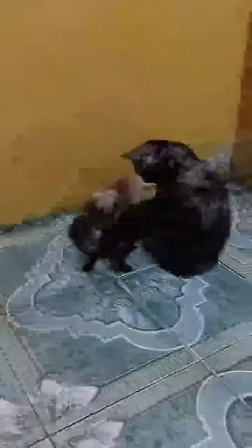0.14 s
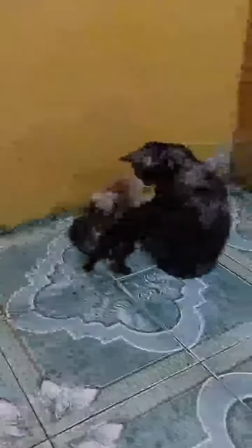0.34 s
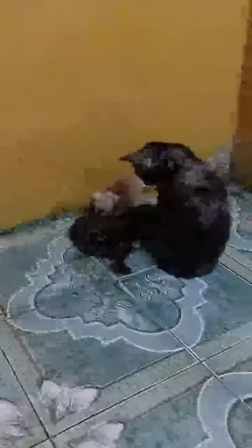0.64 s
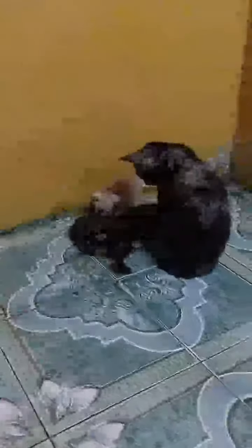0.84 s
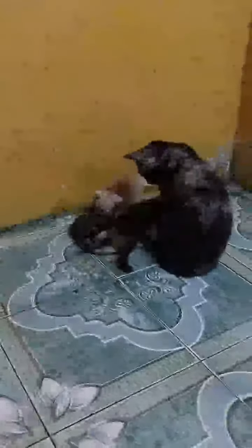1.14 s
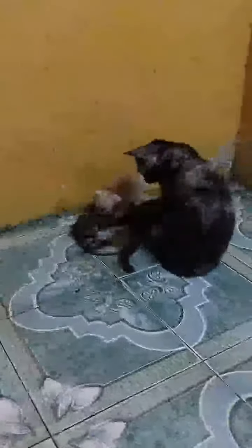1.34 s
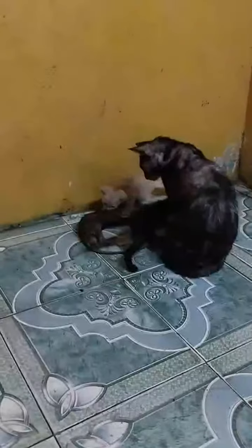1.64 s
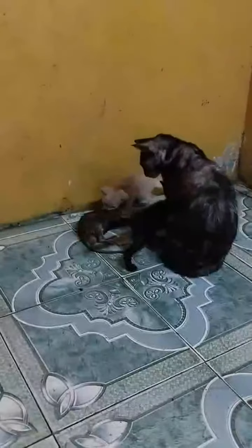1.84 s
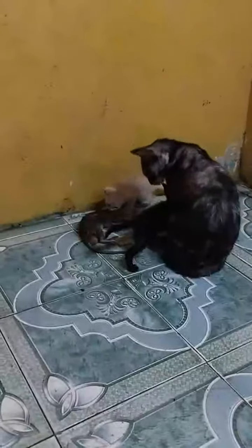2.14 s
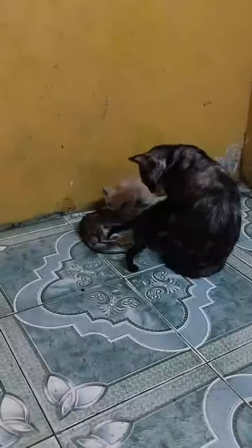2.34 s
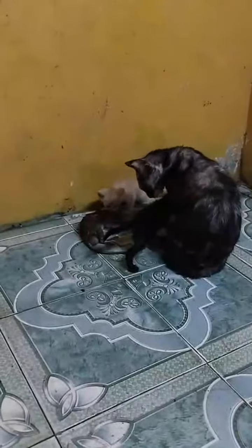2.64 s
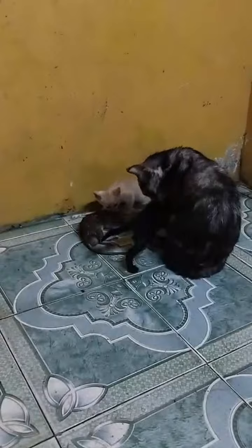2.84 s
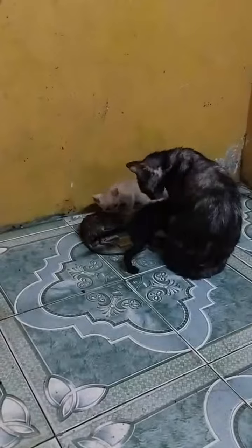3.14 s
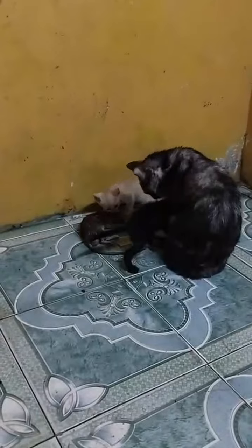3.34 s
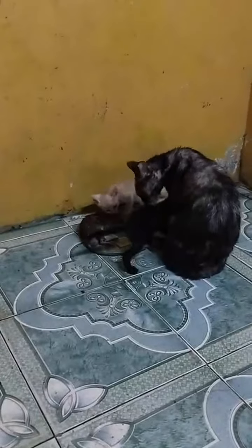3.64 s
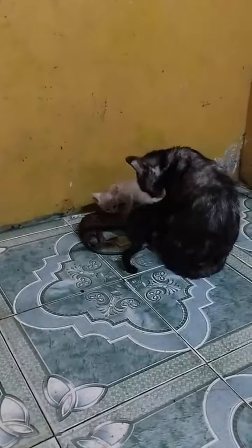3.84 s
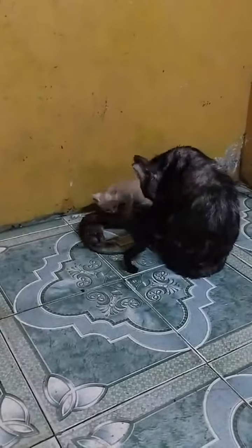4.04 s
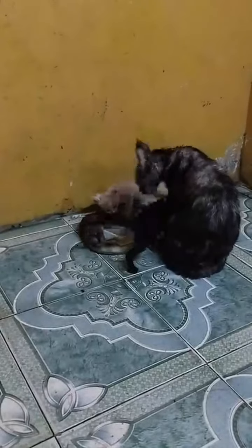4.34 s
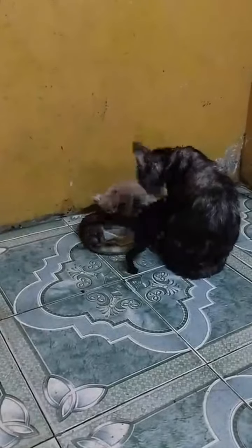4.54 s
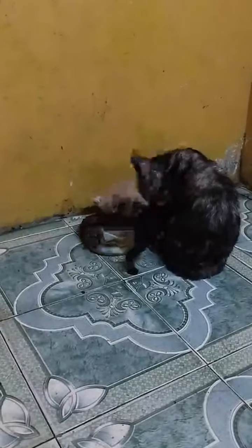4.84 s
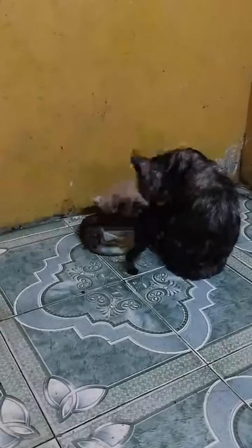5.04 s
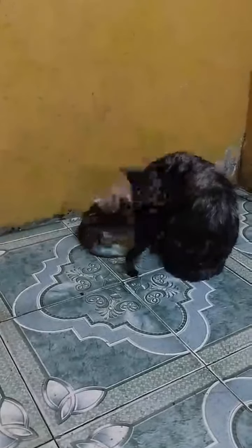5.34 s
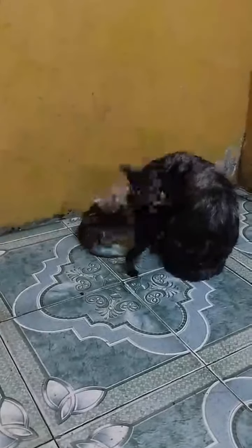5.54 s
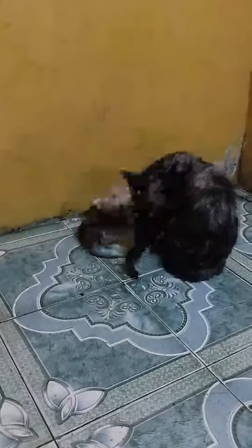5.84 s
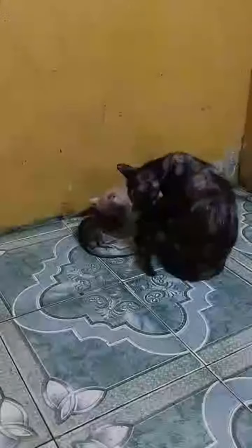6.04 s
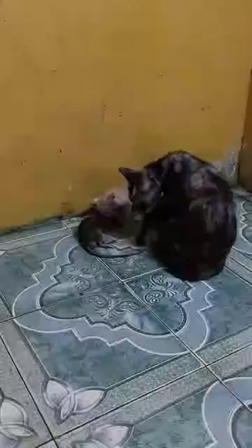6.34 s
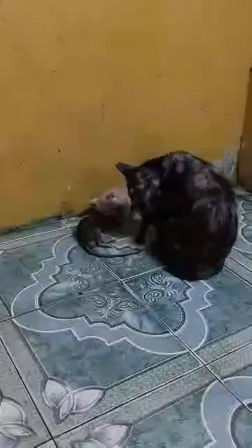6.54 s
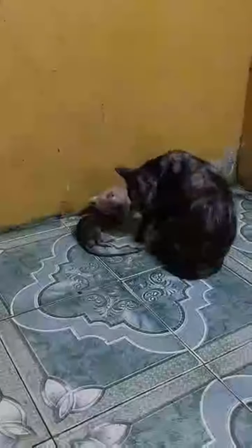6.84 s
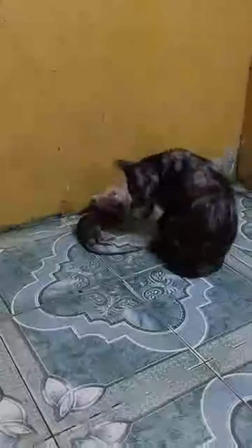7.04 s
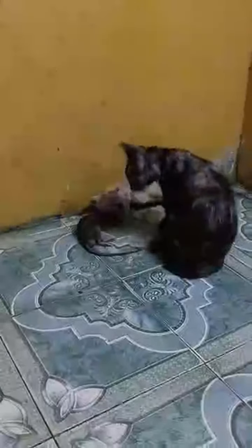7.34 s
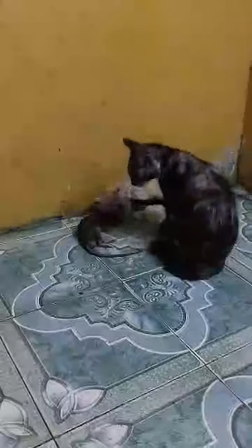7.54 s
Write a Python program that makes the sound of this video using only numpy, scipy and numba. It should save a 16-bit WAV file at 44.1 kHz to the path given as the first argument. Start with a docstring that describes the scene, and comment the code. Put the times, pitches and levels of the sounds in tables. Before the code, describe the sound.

Indoors, a steady low fan hum with a light rush of air runs throughout, and the microphone is nudged softly now and then. A mouse suddenly gives a loud, very short chirp, then two sharp high squeaks and a run of five quieter raspy squeals, each with a short echo off hard walls. It ends with one faint, thin whine, leaving only the hum.

```python
"""First a fan hums and swishes in a tiled room, and a hand-held phone thumps now and then.
Then a mouse, cornered by a pawing cat, gives one chip, two sharp squeaks that crack upward, five
hoarse squeals and a last thin whine. Its tiny vocal folds buzz, its throat and mouth shape the
buzz, and forced air adds hiss and rasp. The bare walls ring after each cry."""
import sys
import numpy as np
from scipy import signal
from scipy.fft import rfft, irfft, next_fast_len
from scipy.io import wavfile
from scipy.ndimage import uniform_filter1d
from numba import njit

SR = 44100
rng = np.random.default_rng(int(sys.argv[2]) if len(sys.argv) > 2 else 0)


def master_out(mix):
    """Clip the mix to full scale and print it as 16-bit PCM to the path in sys.argv[1]."""
    frames = np.transpose(np.atleast_2d(mix))
    ceiling = np.clip(frames, -1, 1)
    pcm = np.round(ceiling * 32767).astype(np.int16)
    wavfile.write(sys.argv[1], SR, pcm)


N = 338688
T = np.arange(N) / SR
TOP_HZ = 15750

# Levels are set before mixing. A share runs from 0 to 1; peak_share is how far in a cry is loudest.
# sharp squeaks: start_s, length_s, pitch_hz, climb_hz_per_s, level_db, peak_share, lead_in_db
SQUEAK_CRIES = [(3.697, .082, 1069, 682, -15.5, 0.93, -34), (3.96, .098, 1093, 400, -11.5, 0.55, -24)]
# voice cracks: start_s, length_s, pitch_hz, glide_octaves, dip_octaves, level_db, rough_share
VOICE_CRACKS = [(3.778, 0.0089, 2440, 0.02, 0, -24, .35), (3.7888, 0.022, 2425, 0.15, .07, -15, .15),
                (3.817, 0.008, 2240, -0.28, 0, -21.5, 0.4), (3.824, .058, 2370, -.06, 0.0096, -35.5, 0.54),
                (4.058, 0.011, 2550, 0.073, 0.053, -23, 0.48),
                (4.067, 0.0237, 2405, 0.078, 0.213, -13.5, 0.1), (4.097, .065, 2385, -.1, 0, -39, 0.38)]
# hoarse squeals: start_s, length_s, pitch_hz, glide_hz_per_s, overshoot_hz, tone_db, peak_share, jet_db
SQUEAL_CRIES = [(3.982, .225, 2358, 1201, -1.5, -34, .55, -46),
                (4.361, 0.19, 2194, 5800, -2, -42.5, 0.86, -49.5),
                (4.763, 0.109, 2260, -300, 463, -32, 0.71, -45),
                (5.165, 0.11, 2260, -500, 459, -32.5, 0.53, -40.5),
                (5.545, 0.15, 2270, -100, 482, -31, 0.49, -43.5)]
# the rasp that ends each squeal: start_s, length_s, level_db, peak_share, mouth_from_hz, mouth_to_hz
SQUEAL_ENDINGS = [(4.091, .14, -39.5, 0.73, 4850, 5350), (4.47, .16, -36, 0.91, 4740, 5690),
                  (4.851, .145, -34, 0.85, 3200, 5030), (5.242, 0.15, -36.5, .55, 3400, 4950),
                  (5.639, 0.15, -35, 0.64, 2920, 5140)]
# the course of the last whine: time_s, level_db, mouth_hz
WHINE_PATH = [(6.28, -69, 6300), (6.33, -47.5, 6450), (6.37, -54, 6400), (6.40, -44, 4700),
              (6.465, -56, 4660), (6.55, -53.5, 5130), (6.64, -73, 5300), (6.68, -48, 1050),
              (6.75, -63, 1000)]
# a sharp chip, scuffs and low pops: start_s, pitch_hz, level_db, rise_s, decay_s, noise_share
SHORT_RINGS = [(3.546, 2224, -3.5, 0.0035, .0017, .09), (3.637, 2170, -29, 0.0032, .009, .55),
               (3.656, 2380, -34.5, .002, 0.065, .6), (3.694, 755, -23.5, .0012, 0.01, .11),
               (3.7003, 615, -12.5, 0.0082, 0.0058, .01), (5.961, 680, -33, 0.0043, 0.01, .51)]
# nudges of the phone: start_s, level_db
PHONE_NUDGES = [(0.452, -44), (1.66, -41), (1.724, -33.5), (1.769, -39), (1.827, -36), (2.158, -40),
                (2.358, -34.5), (3.373, -42), (6.082, -43)]
# echoes from near walls: delay_s, level_db
WALL_ECHOES = [(0.0229, -26), (0.032, -16), (.043, -13.5), (0.067, -11.5)]
# how fast the fan spins: time_s, turns_per_s
FAN_SPIN = [(0, 5), (.4, 4.85), (.8, 4.3), (1.7, 4.55), (2.2, 5), (3.4, 4.95), (3.9, 4.55), (5.2, 4.6),
            (5.7, 5), (7.68, 5.15)]
# how the fan's draught swells and eases: time_s, change_db
FAN_DRAUGHT = [(0, 1), (1.9, -0.8), (3.4, 1.1), (5.3, 1.4), (6.6, 0.7), (7.68, -2.7)]

# A colour says how strong a sound is from low to high.
# throat colours for each kind of cry: frequency_hz, level_db
SQUEAK_COLOUR = [(600, -16.5), (1100, -10.5), (1700, -5), (2200, 4.5), (2650, -5.5), (3300, -52.5),
                 (4400, -14.5), (5000, -23), (5600, -37), (6700, -37), (8000, -61), (15000, -62)]
SQUEAL_COLOUR = [(1200, -50), (2280, -3), (2750, -10), (3300, -19), (4600, 5), (5400, -10.5), (6800, -8.5),
                 (8300, -40), (9100, -18.5), (10300, -26), (11300, -15.5), (12400, -31), (15500, -40)]
WHINE_COLOUR = [(1070, 0.5), (2100, 4), (3200, -7.5), (4280, 1), (5350, -5), (6450, -6.5), (7500, -18),
                (8600, -18.5), (9700, -14), (10700, -16), (11900, -10), (13000, -34)]
# colours of the mouse's breath: frequency_hz, level_db
JET_AIR = [(2000, -28), (3200, -16), (5300, 7), (6300, 2), (8000, -4), (8600, -2), (9200, -12),
           (10300, -3.5), (11400, -5), (12300, -2), (15500, -5)]
RASP_AIR = [(700, -34.5), (1700, -9), (2400, 4.5), (3300, -3), (4600, -0.5), (5900, -7.5), (6900, -3),
            (8200, -11), (8900, -15.5), (11300, -14), (13000, -12), (15500, -14.5)]
SQUEAK_AIR = [(700, -15.5), (2400, 5.5), (3500, -14), (5000, -5), (7000, -15), (10000, -37)]
# colours of the room's ring: frequency_hz, level_db
LONG_TAIL = [(300, -10.5), (1100, -9.5), (2300, -2.5), (6000, 2.5), (9000, -2)]
BRIGHT_TAIL = [(5000, -6), (9000, .5), (16000, -9)]
# colours of the air the fan moves: frequency_hz, level_db
FAN_RUMBLE = [(25, -32), (45, -6.5), (65, -1), (100, -2.5), (170, -1.5), (350, -7), (600, -10),
              (1000, -12.5), (1800, -12.5), (2600, -18.5), (5000, -53)]
FAN_HISS = [(1500, -51), (1850, -10), (2100, 0.5), (2450, -3), (2900, -9), (3500, -10.5), (4500, -8.5),
            (5600, -14.5), (6800, -13.5), (8200, -19.5), (9000, -25.5), (11700, -31.5), (12200, -21.5),
            (15500, -23)]
FAN_SWIRLS = [(150, -26.5), (330, 6), (450, -.5), (900, -25)]
FAN_SWISH = [(1700, -28), (2100, -1), (2400, -.5), (2900, -14.5), (3700, -28), (4450, -12.5),
             (5200, -44), (8000, -44.5)]


def squeaks():
    """Each squeak slides down into its note, climbs steadily, then turns rough and flips upward."""
    out = np.zeros(N)
    lead_s, attack_s, break_s, flip_s = .013, .0017, .005, .0013
    catch_s, catch_width_s = 4.041, .0086  # the voice catches once in the louder squeak
    for start, length, pitch, climb, db, peak, lead_db in SQUEAK_CRIES:
        t = span(lead_s + length)[0] - lead_s
        lead = np.maximum(-t / lead_s, 0)
        voiced = np.clip(t / attack_s, 0, 1)
        breaking = np.exp((t - length) / break_s)
        bend_octaves = .9 * lead + .51 * np.exp((t - length) / flip_s)
        hz = (pitch + climb * t) * 2 ** bend_octaves
        rise, fall = arch(t / length, peak)
        catch_db = -6 * np.exp(-((start + t - catch_s) / catch_width_s) ** 2)
        note_db = db - 5 * np.sqrt(rise) - 5.5 * fall * breaking + catch_db
        gain = voiced * undb(note_db) + (1 - voiced) * (1 - lead) * undb(lead_db)
        rough = .048 + .53 * (1 - voiced) + .55 * breaking
        add(out, start - lead_s, fade(t + lead_s) * gain * sharp_voice(hz, rough))
    return out


def cracks():
    """After each squeak the voice cracks into broken yelps about an octave higher."""
    out, edge_s = np.zeros(N), .0029
    for start, length, pitch, glide, dip, db, rough in VOICE_CRACKS:
        t, progress = span(length)
        hz = pitch * 2 ** (glide * (progress - .5) + dip * (2 * progress - 1) ** 2)
        add(out, start, fade(t, edge_s, edge_s) * undb(db) * sharp_voice(hz, rough))
    return out


def squeals():
    """Strained cries: a shaky tone swells over a jet of air and is cleanest at its loudest."""
    out = np.zeros(N)
    settle_s, peak_rough, edge_rough = .025, .44, 1.2
    for start, length, pitch, glide, overshoot, tone_db, peak, jet_db in SQUEAL_CRIES:
        t, progress = span(length)
        rise, fall = arch(progress, peak)
        hz = pitch + glide * (t - length / 2) + overshoot * np.exp(-t / settle_s)
        rough = peak_rough + (edge_rough - peak_rough) * (rise + fall)
        # the folds shake quickly, which smears the pitch and sounds hoarse
        hoarse_hz = hz * (1 + .037 * rough * wander(len(t), 700))
        tone = vocal_folds(hoarse_hz, rough, SQUEAL_COLOUR, shake=.035, shake_hz=200, flutter_db=5)
        tone *= fade(t) * undb(tone_db - 15.5 * rise - 22 * fall)
        jet = noise(len(t), JET_AIR) * fade(t, attack_s=.038, release_s=.026)
        jet *= undb(jet_db + 1.5 * wander(len(t), 50))
        add(out, start, tone + jet)
    return out


def rasps():
    """Each squeal breaks up into rough air and a shaky whistle that rise as the mouth opens."""
    out = np.zeros(N)
    for start, length, db, peak, from_hz, to_hz in SQUEAL_ENDINGS:
        t, progress = span(length)
        n = len(t)
        mouth_hz = from_hz + (to_hz - from_hz) * progress
        whistle_hz = mouth_hz * (1 + .05 * wander(n, 500))
        whistle = np.sin(phase_of(whistle_hz)) * wander(n, 190)
        mouth = unit(resonance(noise(n, RASP_AIR), mouth_hz, width_hz=1350.0))
        rasp = unit(whistle + undb(2) * mouth + undb(-2) * noise(n, RASP_AIR))
        rise, fall = arch(progress, peak)
        level_db = db - 7.5 * rise - 12 * fall + 2.5 * wander(n, 150)
        add(out, start, fade(t, attack_s=.029, release_s=.01) * rasp * undb(level_db))
    return out


def whine():
    """A weak cry scoops up into a gently arching note; the closing mouth picks out lower overtones."""
    out = np.zeros(N)
    top_hz, top_s, scoop_hz, scoop_s = 1078, 6.44, 79.7, .02
    times, levels, mouths = np.transpose(WHINE_PATH)
    t, _ = span(times[-1] - times[0])
    clock = times[0] + t
    hz = top_hz - 900 * (clock - top_s) ** 2 - scoop_hz * np.exp(-t / scoop_s)
    mouth_hz = np.interp(clock, times, mouths)
    mouth = lambda f: 1 + 5 / (1 + ((f - mouth_hz) / 500) ** 2)
    tone = vocal_folds(hz, .12, WHINE_COLOUR, shake=.042, shake_hz=200, flutter_db=12, mouth=mouth)
    add(out, times[0], fade(t) * undb(np.interp(clock, times, levels)) * tone)
    return out


def sharp_voice(hz, rough):
    """The voice of a squeak or crack: buzzing folds, plus more breath the rougher it gets."""
    tone = vocal_folds(hz, rough, SQUEAK_COLOUR, shake=.07, shake_hz=500, flutter_db=5)
    breath = noise(len(hz), SQUEAK_AIR)
    return tone + breath * (undb(-45) + undb(-5) * rough)


def vocal_folds(hz, rough, throat, shake, shake_hz, flutter_db, mouth=lambda f: 1):
    """Tiny folds buzz through the throat; roughness shakes their pitch and loudness."""
    n = len(hz)
    phase = phase_of(hz * (1 + shake * rough * wander(n, shake_hz)))
    harmonics = np.arange(1, 13)[:, None]  # whole multiples of the pitch
    harmonic_hz = harmonics * hz
    gains = gain_at(harmonic_hz, throat) * mouth(harmonic_hz) * (harmonic_hz < TOP_HZ)
    tone = (gains * np.sin(harmonics * phase)).sum(0)
    tone /= np.sqrt((gains ** 2).sum(0) / 2)
    return tone * undb(flutter_db * rough * wander(n, 320))


def chips():
    """A chip, scuffs and pops: brief mixes of tone and noise that swell and quickly die away."""
    out, t = np.zeros(N), T[:SR // 8]
    for start, hz, db, rise, decay, noise_share in SHORT_RINGS:
        shape = np.minimum(t / rise, 1) ** 2 * np.exp(-np.maximum(t - rise, 0) / decay)
        phase = phase_of(hz * (1 + .27 * np.exp(-t / .002)))  # starts high, then settles
        ring = np.sin(phase) + undb(-26.5) * np.sin(2 * phase)
        scuff = noise(len(t), [(hz / 4, -12), (hz, 0), (hz * 2, -7), (7000, -24), (12000, -50)])
        burst = (1 - noise_share) * ring + noise_share * scuff
        add(out, start, undb(db - 1.5) * shape * burst)
    return out


def room(sound):
    """Tiles and plaster send back a few echoes and a ringing tail that loses its treble first."""
    t = T[:SR]
    long_s, bright_s = .49, .26  # time to fade by 60 dB
    tail = noise(SR, LONG_TAIL) * undb(-60 * t / long_s)
    tail += .92 * noise(SR, BRIGHT_TAIL) * undb(-60 * t / bright_s)
    tail *= np.clip(t / .0019, 0, 1)
    tail /= np.sqrt(np.sum(tail ** 2))
    for delay, db in WALL_ECHOES:
        tail[int(delay * SR)] += undb(db)
    return signal.fftconvolve(sound, tail)[:N]


def thumps():
    """The hand nudges the phone: a few low swings that soon stop."""
    out, t = np.zeros(N), T[:SR // 4]
    pitch_hz, rise_s = 64, .014
    shape = t / rise_s * np.exp(1 - t / rise_s)
    for start, db in PHONE_NUDGES:
        phase = 2 * np.pi * pitch_hz * (1 + .049 * rng.standard_normal()) * t
        swings = np.sin(phase) + .5 * np.sin(1.56 * phase)
        add(out, start, undb(db + 4.5) * shape * swings)
    return out


def fan():
    """The motor hums at twice the mains rate; the blades swish once a turn over a rush of air."""
    hum_hz, hum_db = 120.3, -41.5
    turn = np.cos(phase_of(np.interp(T, *np.transpose(FAN_SPIN))))
    throb_db = .84 * turn + .36 * wander(N, 4.2)
    hum = np.sqrt(2) * np.sin(2 * np.pi * hum_hz * T + .12 * wander(N, 4)) * undb(hum_db + throb_db)
    draught_db = np.interp(T, *np.transpose(FAN_DRAUGHT))
    rumble_db = -45.5 + .71 * draught_db + .9 * wander(N, 5)
    rumble = noise(N, FAN_RUMBLE) * undb(rumble_db)
    swirls = noise(N, FAN_SWIRLS) * undb(-56 + 2 * wander(N, 9))
    hiss = noise(N, FAN_HISS) * undb(-52.5 + .86 * draught_db + .46 * turn + wander(N, 29))
    swish_db = -53 + .86 * draught_db + 4.8 * turn + 1.2 * wander(N, 8)
    swish = noise(N, FAN_SWISH) * undb(swish_db)
    return hum + rumble + swirls + hiss + swish


def undb(db):
    """Turn decibels into a gain to multiply by."""
    return 10 ** (np.asarray(db) / 20)


def unit(x):
    """Scale a sound to an average power of 1."""
    return x / np.sqrt(np.mean(x ** 2) + 1e-18)


def phase_of(hz):
    """The angle a wave has turned through as its pitch moves."""
    return 2 * np.pi * np.cumsum(hz) / SR


def gain_at(hz, colour):
    """The gain of a colour at the given frequencies."""
    f, db = np.transpose(colour)
    return undb(np.interp(np.log(hz + 1), np.log(f), db))


def noise(n, colour):
    """Noise with the given colour."""
    gains = gain_at(np.fft.rfftfreq(n, 1 / SR), colour)
    return unit(irfft(rfft(rng.standard_normal(n)) * gains, n))


def wander(n, rate):
    """A smooth random wobble, about 1 in size, that moves about rate times a second."""
    size = next_fast_len(max(n, SR))
    f = np.fft.rfftfreq(size, 1 / SR)
    spectrum = rfft(rng.standard_normal(size)) / (1 + (f / rate) ** 4)
    return unit(irfft(spectrum, size))[:n]


@njit
def resonance(x, hz, width_hz):
    """A filter that keeps the sound near a moving frequency."""
    out, band_state, low_state = np.empty(len(x)), 0., 0.
    for i in range(len(x)):
        step, damping = np.tan(np.pi * hz[i] / SR), width_hz / hz[i]
        band = (band_state + step * (x[i] - low_state)) / (1 + step * (step + damping))
        band_state = 2 * band - band_state
        low_state += 2 * step * band
        out[i] = damping * band
    return out


def span(length):
    """Time into a cry, in seconds and as a share of its length."""
    t = np.arange(0, length, 1 / SR)
    return t, t / length


def arch(progress, peak):
    """Squared distance before and after a cry's peak: 1 at its end, 0 at the peak."""
    before = np.maximum(1 - progress / peak, 0)
    after = np.maximum((progress - peak) / (1 - peak), 0)
    return before ** 2, after ** 2


def fade(t, attack_s=.002, release_s=.0015):
    """Fade in, hold, fade out."""
    return np.clip(np.minimum(t / attack_s, (t[-1] - t) / release_s), 0, 1)


def add(out, start_s, sound):
    """Mix a sound in at its start time."""
    i = max(int(start_s * SR), 0)
    out[i:i + len(sound)] += sound[:N - i]


def scene():
    """The squeaks arrive mostly direct; much of the squeals and whine comes by way of the walls."""
    sharp = squeaks() + cracks()
    hoarse = squeals() + rasps()
    thin, brief = whine(), chips()
    direct = sharp + brief + undb(-2.5) * hoarse + undb(1) * thin
    walls = room(undb(-12.5) * sharp + undb(-32) * brief + undb(-4) * hoarse + undb(.5) * thin)
    return (direct + walls + thumps() + fan())[None]


def record(dry):
    """The sound drops out for an instant, and the highest treble is cut."""
    gap_start_s, gap_end_s, gap_db = 5.9425, 5.962, -36
    in_gap = (T > gap_start_s) & (T < gap_end_s)
    soft_gap = uniform_filter1d(in_gap.astype(float), size=40)
    treble_cut = signal.ellip(10, .2, 80, TOP_HZ, fs=SR, output="sos")
    return signal.sosfilt(treble_cut, dry * undb(gap_db * soft_gap))


dry = scene()
out = record(dry)
master_out(out)
```